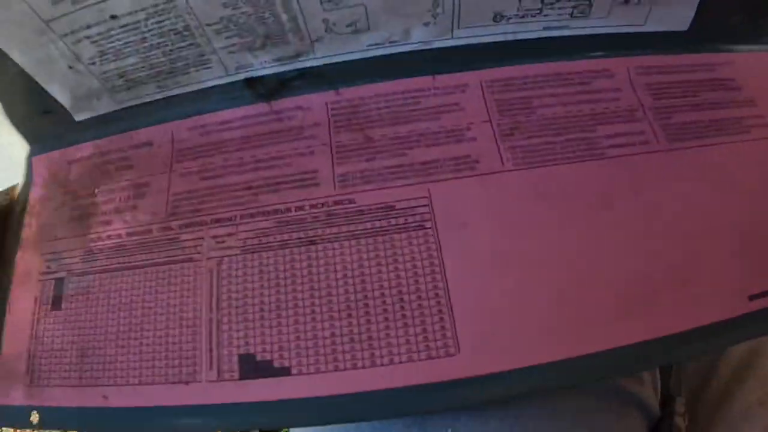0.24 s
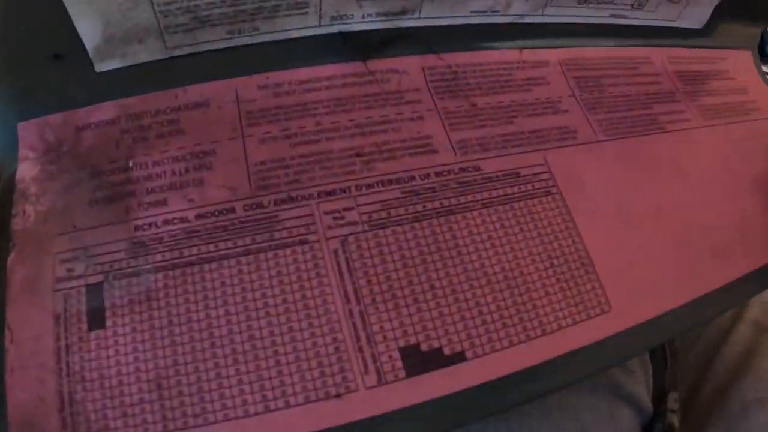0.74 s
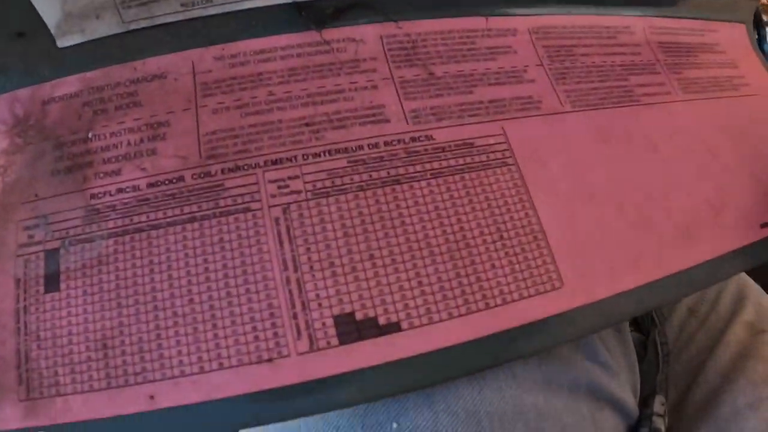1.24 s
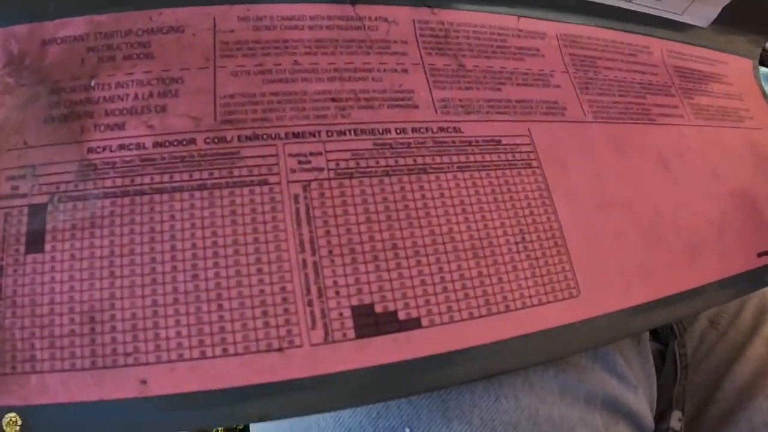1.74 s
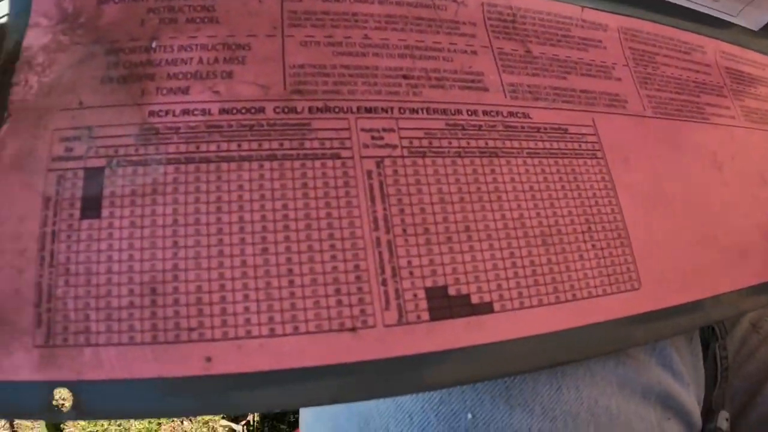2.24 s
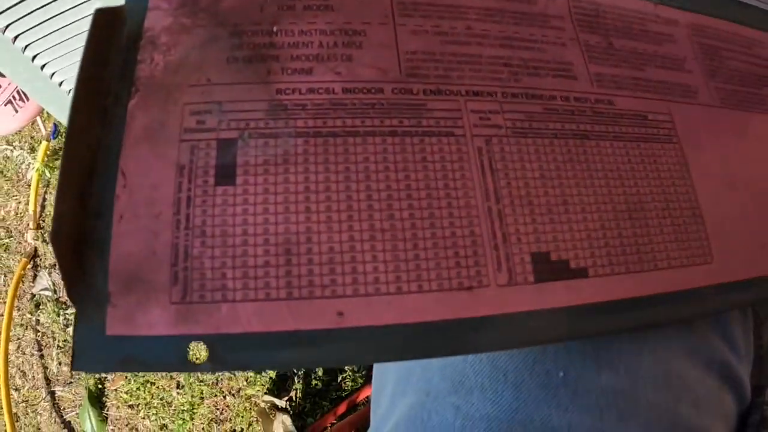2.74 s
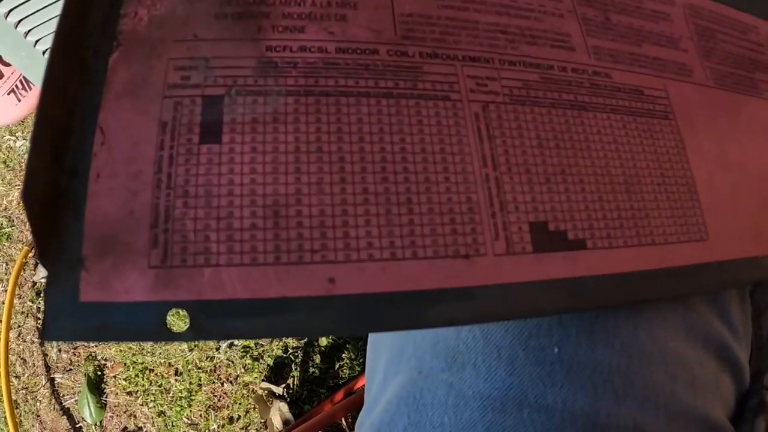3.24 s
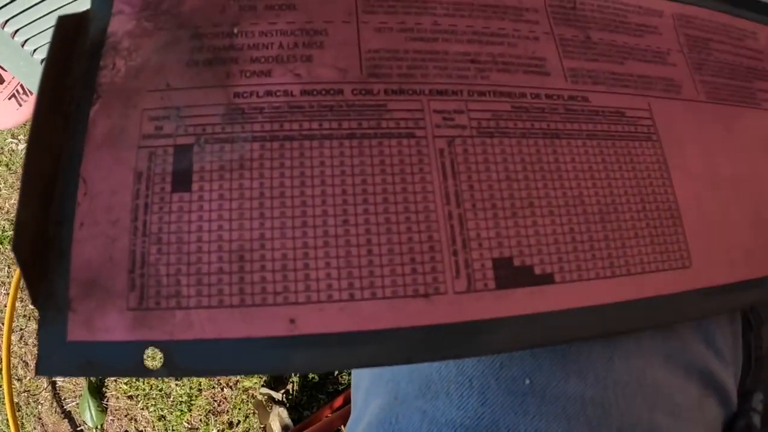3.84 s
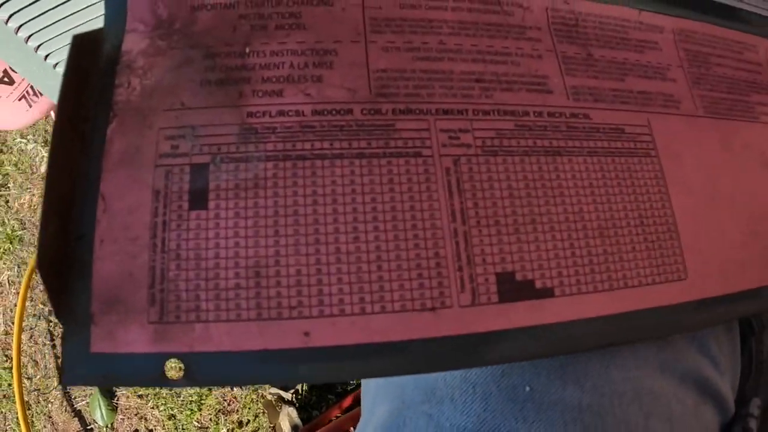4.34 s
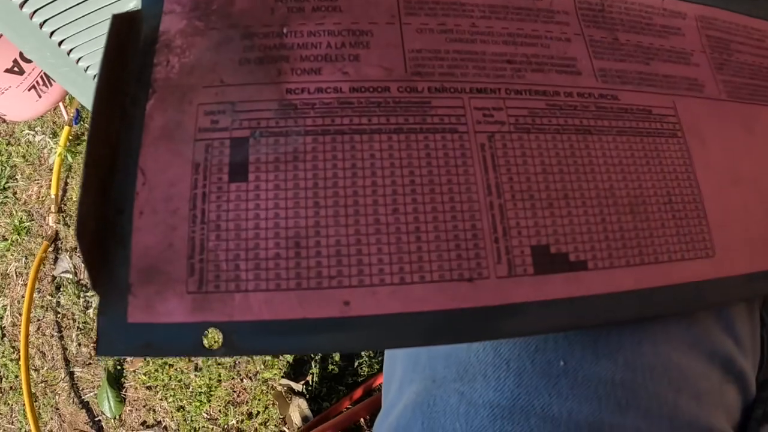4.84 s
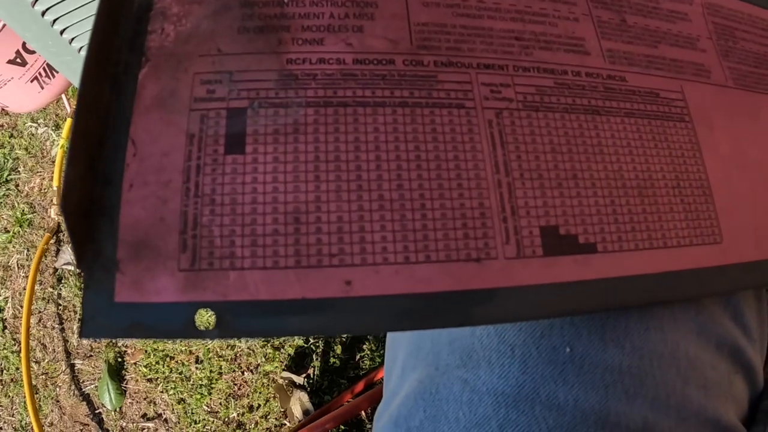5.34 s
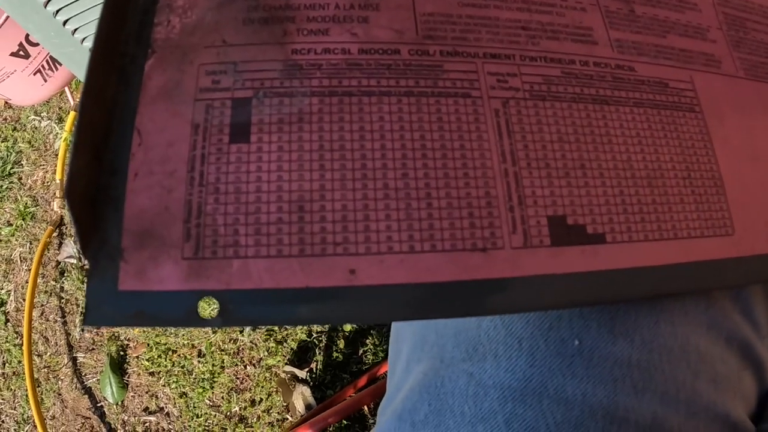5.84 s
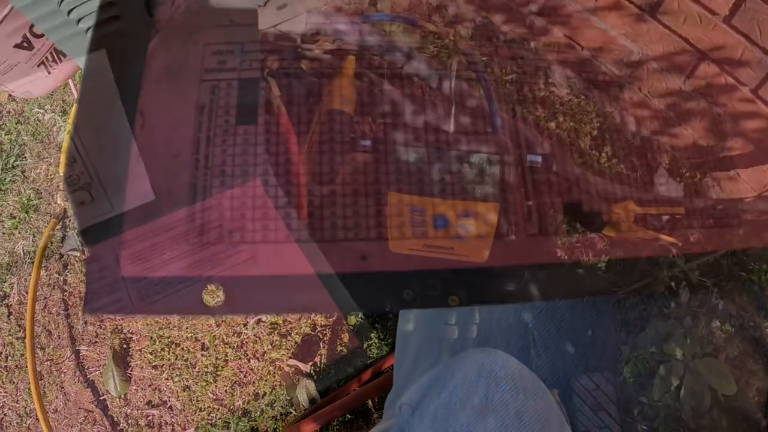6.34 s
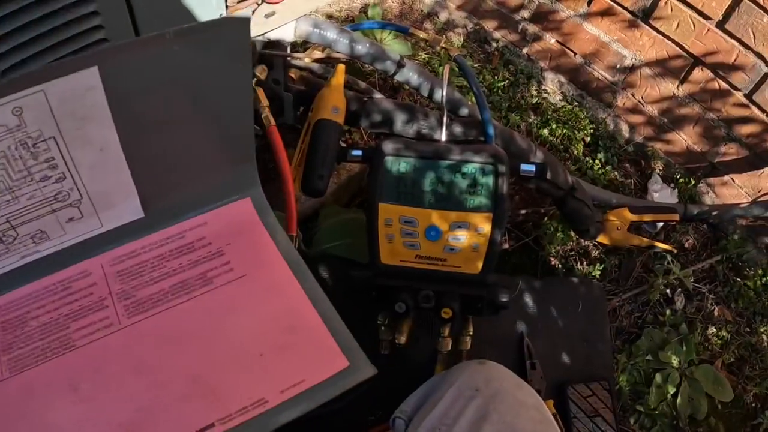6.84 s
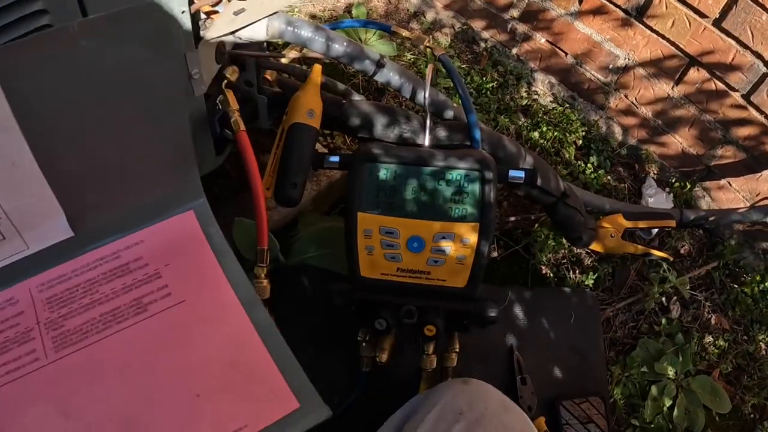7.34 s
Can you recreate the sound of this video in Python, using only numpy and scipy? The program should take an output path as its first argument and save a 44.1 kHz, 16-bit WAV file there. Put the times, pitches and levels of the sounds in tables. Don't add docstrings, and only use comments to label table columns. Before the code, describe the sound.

Close outdoor cooling unit running continuously: deep fluttering fan thump, breathy rush and faint compressor hum, broken briefly by a sharp sheet-metal tick.

```python
import sys
import numpy as np
from scipy import signal
from scipy.fft import rfft, irfft, next_fast_len
from scipy.io import wavfile
from scipy.ndimage import uniform_filter1d, map_coordinates

SR = 44100
rng = np.random.default_rng(int(sys.argv[2]) if len(sys.argv) > 2 else 0)


def rack_gain(trim_db):
    fader = np.asarray(trim_db, float)
    return 10 ** (fader / 20)


def output_pcm(signal):
    pcm = np.clip(np.atleast_2d(signal).T, -1, 1) * 32767
    wavfile.write(sys.argv[1], SR, np.round(pcm).astype(np.int16))


N = 334719
T = np.arange(N) / SR
PAD = next_fast_len(N + 8192)
HZ = np.fft.rfftfreq(PAD, 1 / SR)

# start in seconds, end in seconds.
DISSOLVE_S = (6.19, 6.674)
MIC_TURN_S = (2.2, 2.5)

BLADE_HZ, SHAFT_HZ, MAINS_HZ = 28.3, 59.36, 120
# multiple of the blade rate, peak level in dB at the first place, at the second.
THUMP = [(1, -13, -14.5), (2, -30.3, -26.5), (3, -41, -35.5), (4, -43, -42), (5, -48, -54), (6, -46, -52),
         (8, -43.5, -42), (10, -47, -46), (11, -45, -55), (12, -52, -52)]
BLADE_ANGLE = (-1.38, -4.1)
SKEW_RAD = 1.5
# band centre in Hz, depth in dB, lag in radians.
CHOP = [(90, 2, -3), (184, 2.5, 2.5), (308, 3, 1), (550, 3.5, -0.24), (945, 2.3, 0.7), (2200, 2.5, 0.6),
        (4500, 1.3, 1.3), (9000, 1.5, 2.3)]
SECOND_CHOP = .45
# frequency in Hz, density in dB per Hz.
RUSH = [
    [(39, -29), (66, 1.5), (86, -5), (113, -2), (141, -3), (192, -4), (222, 2), (257, -6.5), (298, -0.5),
     (359, -3.5), (550, -7), (878, -18.5), (951, -15.5), (1230, -15.5), (1600, -21.5), (2080, -78),
     (3520, -120)],
    [(39, -34), (66, -13), (124, -4), (172, -13), (225, -2), (260, -8.5), (302, -5), (410, -10.5),
     (560, -13.5), (850, -18.5), (960, -15.5), (1130, -18), (1400, -20), (1600, -27), (2080, -58),
     (3500, -120)],
]
# frequency in Hz, density in dB per Hz.
HISS = [
    [(940, -9), (1600, -6.5), (1700, 1), (2190, 2), (2390, -4), (2680, -3.5), (3400, -6.5), (4270, -9),
     (5090, -6), (6060, -14), (6920, -12.5), (8610, -22.5), (10200, -25), (13000, -28.5)],
    [(940, -18), (1600, 2), (1890, -1), (2060, 1), (2230, -3.5), (2760, -2.5), (3430, -3), (3980, -6.5),
     (5000, -6), (7550, -13), (9570, -23.5), (12200, -25), (13000, -23), (14300, -34)],
]
RUSH_DB = (-30, -30)
HISS_DB = (-46, -43)
# frequency in Hz, density in dB per Hz.
RUMBLE = [(4, -30), (9, 20), (30, 9), (60, 14.5), (75, -24), (120, -120)]
# frequency in Hz, gain in dB.
AIR_TOP = [(13000, 5.5), (13500, -9), (14000, -13), (15500, -20)]
# time in seconds, level in dB about the mean.
FLOW = [(0, 0.7), (.7, 0.9), (1.5, -0.3), (2.8, 0.5), (4, 0.2), (5.5, -0.08), (6.7, -0.5), (7.59, -1.5)]

# frequency in Hz, left-right likeness from 0 to 1.
ALIKE = [(60, 0.99), (300, 1), (610, 0.9), (1310, 0.93), (2000, 0.66), (2830, 0.59), (4200, 0.81),
         (6120, 0.64), (8000, 0.38), (10000, 0.78), (11500, 0.27), (13200, 0.17)]
# frequency in Hz, left over right in dB.
LEAN = [
    [(60, 0.0), (110, 0.0), (200, 0.0), (360, 1.0), (660, 1.5), (1200, 3.5), (2190, 2.5), (3990, 1.0),
     (7260, 2.5), (13200, 4.5)],
    [(60, 0.0), (110, 0.0), (200, 0.5), (360, 2.0), (660, 2.0), (1200, 4.5), (2190, 4.0), (3990, 3.5),
     (7260, 3.0), (13200, 5.5)],
]
# frequency in Hz, lead of the left in radians.
LEAD = [(100, -0.045), (600, 0.055), (1120, -1.25), (1460, 0.84), (2580, -0.43), (3620, 0.023), (9000, 0)]

# start in seconds, peak level in dB, pitch in Hz.
CHUFFS = [(0.0017, -25.7, 590), (0.0328, -23.8, 515), (0.0709, -24.4, 575), (0.1391, -24.2, 410),
          (0.3214, -24.7, 485), (0.3883, -24.9, 500), (0.5712, -24.7, 440), (0.6393, -22.0, 425),
          (0.7505, -24.7, 515), (0.7781, -23.2, 620), (0.8868, -23.1, 455), (1.0625, -23.7, 425),
          (1.0985, -24.0, 590), (1.2395, -22.4, 410), (1.311, -23.4, 470), (1.4849, -23.4, 575),
          (1.698, -23.4, 485), (1.7737, -23.7, 575), (1.8012, -24.2, 455), (1.8411, -25.9, 605),
          (1.91, -24.9, 665), (2.0174, -25.3, 560), (2.0495, -22.7, 425), (2.1555, -24.4, 485),
          (2.196, -25.8, 605), (2.4737, -25.1, 530), (2.5851, -24.2, 530), (2.7251, -25.1, 530),
          (2.9324, -24.5, 590), (3.2188, -24.8, 590), (3.3985, -24.7, 530), (3.5673, -25.8, 590),
          (3.7167, -24.4, 590), (3.7476, -25.2, 695), (3.926, -23.2, 410), (4.0321, -24.3, 500),
          (4.0648, -25.7, 560), (4.1055, -23.0, 545), (4.1381, -25.6, 590), (4.2744, -26.3, 680),
          (4.3109, -24.6, 440), (4.4224, -22.3, 425), (4.4863, -24.0, 680), (4.5645, -24.9, 530),
          (4.6299, -25.4, 665), (5.0204, -24.5, 635), (5.1239, -23.2, 515), (5.1961, -23.1, 575),
          (5.3399, -23.0, 590), (5.3747, -23.5, 560), (5.4146, -20.6, 425), (5.5177, -24.7, 500),
          (5.5505, -23.8, 530), (5.7586, -26.3, 650), (5.9367, -23.6, 455), (6.1202, -23.0, 515),
          (6.1468, -23.8, 515), (6.1873, -21.0, 410), (7.1119, -24.6, 440), (7.2201, -24.4, 470)]
# start in seconds, peak level in dB, pitch in Hz.
FLICKS = [(1.413, -26, 430), (3.255, -26, 498), (4.843, -27, 538), (4.948, -26, 611), (5.83, -27, 560),
          (6.809, -28, 484), (7.049, -27, 420)]
# start in seconds, peak level in dB, pitch in Hz.
ROLLS = [(0.001, -24.2, 221), (0.1486, -26.1, 325), (0.1834, -25.9, 309), (0.2178, -25.2, 293),
         (0.3141, -25.7, 309), (0.4122, -25.4, 349), (0.4537, -26.3, 333), (0.496, -22.7, 277),
         (0.5312, -23.4, 325), (0.575, -25.2, 237), (0.6153, -24.5, 309), (0.6449, -19.7, 301),
         (0.6862, -23.2, 269), (0.7409, -22.1, 253), (0.8147, -23.5, 237), (0.8563, -24.8, 245),
         (0.8897, -23.9, 221), (1.0909, -26.7, 357), (1.2407, -23.3, 309), (1.3145, -26.0, 317),
         (1.3453, -25.6, 317), (1.5209, -24.5, 309), (1.5705, -22.5, 237), (1.8026, -25.9, 309),
         (1.8879, -26.3, 349), (2.0563, -24.8, 309), (2.0904, -24.3, 237), (2.1943, -25.6, 309),
         (2.3121, -23.1, 237), (2.3695, -25.9, 341), (2.4134, -24.8, 317), (2.445, -23.9, 245),
         (2.4792, -22.5, 237), (2.6501, -22.8, 333), (2.8241, -25.0, 301), (3.0757, -24.4, 237),
         (3.2201, -23.3, 325), (3.2555, -26.0, 325), (3.5018, -24.4, 317), (3.6069, -24.9, 237),
         (3.6779, -25.1, 293), (3.7109, -21.8, 309), (3.7515, -24.2, 237), (3.7884, -24.8, 317),
         (3.86, -25.1, 309), (3.8915, -25.6, 309), (4.0002, -25.2, 229), (4.2454, -24.9, 309),
         (4.4229, -24.7, 221), (4.5032, -24.2, 229), (4.5352, -23.4, 237), (4.7994, -25.6, 317),
         (4.9191, -24.6, 237), (5.1263, -25.1, 245), (5.7319, -25.6, 325), (6.0724, -24.9, 317),
         (6.1758, -26.3, 365), (6.214, -26.5, 349), (6.7683, -24.3, 333), (7.1517, -24.9, 229)]
# start in seconds, peak level in dB, pitch in Hz.
SNAPS = [(0.111, -31, 751), (0.178, -31, 1200), (0.392, -28, 1200), (0.71, -30, 1200), (0.926, -30, 939),
         (1.038, -30, 1060), (1.172, -31, 794), (1.755, -29, 1250), (2.02, -31, 754), (2.384, -30, 1190),
         (2.558, -30, 1270), (2.694, -30, 818), (2.767, -30, 1180), (2.822, -29, 1260), (2.873, -30, 826),
         (2.933, -29, 770), (3.075, -28, 1190), (3.323, -29, 1250), (3.434, -29, 1360), (3.542, -30, 810),
         (3.72, -31, 1310), (3.798, -30, 937), (4.066, -30, 915), (4.111, -27, 1240), (4.493, -30, 1000),
         (4.64, -28, 1030), (4.843, -29, 1180), (4.925, -31, 1040), (5.069, -32, 950), (5.802, -30, 937),
         (5.913, -27, 953), (6.087, -31, 1050), (6.155, -31, 1250), (6.262, -30, 1230), (6.482, -32, 1240),
         (6.585, -30, 926), (6.659, -27, 1130), (6.727, -28, 1140), (6.763, -29, 1100), (7.032, -28, 1110),
         (7.222, -29, 1130), (7.283, -31, 1130), (7.4, -28, 926), (7.443, -31, 907), (7.511, -27, 904)]
# peak level in dB, pitch in Hz, decay in seconds.
FIRST_BURST = (-14.5, 400, .0016)
VORTEX_RISE_S, ROLL_RISE_S, SNAP_RISE_S = 0.0024, .007, 0.0015
ROLL_TRIM_DB, SNAP_TRIM_DB = -1.1, -3
SAG = .04
CALM_DB = 9

# multiple of the shaft rate, peak level in dB early, in dB after the microphones
# turn, in dB at the second place, left over right in dB.
ORDERS = [(1, -47, -52, -45, 0), (2, -48, -51, -49, 0), (5, -44, -49, -43, 0), (11, -49, -48, -55, 1),
          (15, -61, -57, -55, 7), (16, -54, -48.5, -54, 7), (17, -62, -61, -54, 4), (18, -65, -63, -54, 4),
          (19, -53, -52, -46, 6), (20, -47.5, -48, -56, 2), (21, -61, -57, -56, 1), (34, -67, -70, -68, 2),
          (70, -74, -66, -65, 2), (84, -74, -73, -76, 2)]

# start in seconds, peak level in dB, ring T60 in seconds, bite from 0 to 1, ring pitch in Hz.
SLIPS = [(3.2435, -47, .12, .05, 7350), (3.2505, -40, .05, .3, 7200), (3.2538, -37, .04, .35, 8300),
         (3.2562, -23.5, .012, .2, 7400), (3.2632, -33, .06, .15, 7400), (3.2652, -37, .04, .6, 8300),
         (3.269, -33, .016, 1, 7300), (3.2712, -30, .022, .25, 7450), (3.2735, -31, .015, .3, 7600),
         (3.2752, -38, .02, .5, 10200), (3.279, -45, .04, .75, 8300)]
# frequency in Hz, level in dB, left over right in dB.
EDGE_MODES = [(3600, -12, 0), (4550, -1, -5), (5450, -1, 6), (6500, -6, 2), (7000, -4, -3), (8400, -3, -3),
              (9400, -9, 0), (10200, -5, 0), (11200, -11, 6), (12000, -5, 10), (12900, -9, 10),
              (14200, -14, 8)]
# frequency in Hz, gain in dB.
EDGE_TOP = [(13100, 0), (13500, -13), (16000, -16)]
LIGHT_DB, BITE_DB = -17, 17
GRIT = .5
# centre in seconds, level in dB, half length in seconds, pitch in Hz.
SCRAPES = [(.008, -54, .006, 4000), (.048, -64, .004, 10000), (.07, -64, 0.0054, 10500),
           (.062, -57, .022, 7960), (.125, -62, .02, 7500), (.32, -55.5, 0.49, 4500),
           (.538, -61, 0.008, 8500), (.515, -66, .006, 9000), (.548, -51, 0.015, 4900),
           (1.02, -65, 0.018, 10000), (2.83, -61, .006, 6500), (6.692, -57, .006, 7000)]
# centre in seconds, level in dB, half length in seconds, pitch in Hz.
FLEXES = [(.45, -61, .04, 7100), (0.1, -59, .03, 5050), (3.8, -55, .008, 5400), (0.59, -55, .025, 5180),
          (.69, -61, .025, 5050), (0.54, -27.5, 0.04, 166.4), (0.52, -61, 0.092, 4960),
          (0.82, -29.5, 0.025, 109), (.76, -66, .06, 5100)]
SCRAPE_OCTAVES, FLEX_OCTAVES = 0.56, 0.063
SHARPENING = .35

# centre in seconds, peak level in dB, left over right in dB.
GUSTS = [
    (7.529, -17, -9),
    (7.563, -19, -6.5),
]
GUST_HALF_S, BUFFET_DB = 0.0029, -53


def fan(place):
    blade = 2 * np.pi * BLADE_HZ * T + BLADE_ANGLE[place] + 0.046 * wobble(2.52)
    thump = np.zeros(N)
    for k, *db in THUMP:
        level = rack_gain(db[place] + 0.12 * np.sqrt(k) * wobble(5.2))
        thump += level * np.cos(k * blade + SKEW_RAD * max(k - 2, 0))
    flow_db = np.interp(T, *np.transpose(FLOW))
    rush = chopped(pair(RUSH[place], LEAN[place]), blade, eddy_db=.6, place=place)
    hiss = chopped(pair(HISS[place], LEAN[place]), blade, eddy_db=0.82, place=place)
    rumble = rack_gain(-40) * unit(from_spectrum(pair(RUMBLE, LEAN[place])))
    air = rack_gain(RUSH_DB[place] + flow_db) * rush + rack_gain(HISS_DB[place] + flow_db) * hiss
    return thump + air + rumble + shedding(place)


def chopped(spectra, blade, eddy_db, place):
    centres = [hz for hz, _, _ in CHOP]
    out, shared = np.zeros((2, N)), wobble(BLADE_HZ)
    root, tip = calm(ROLLS, ROLL_RISE_S), calm(CHUFFS + FLICKS, VORTEX_RISE_S)
    snap = calm(SNAPS, SNAP_RISE_S)
    thinned = {1: root / 2, 2: np.minimum(root, tip / 2), 3: tip, 4: np.minimum(tip / 4, snap / 2)}
    for k, (hz, depth_db, lag) in enumerate(CHOP):
        share = along([(c, float(j == k)) for j, c in enumerate(centres)])
        cycle = np.cos(blade - lag + 0.83 * np.cos(blade - lag))
        heard = SECOND_CHOP if place and hz > 700 else 1
        swell_db = depth_db * heard * cycle + eddy_db * (.5 * shared + .7 * wobble(14))
        band = from_spectrum(spectra * share * rack_gain(along(AIR_TOP)))
        out += rack_gain(swell_db + thinned.get(k, 0)) * band
    return out / np.sqrt(np.mean(out.mean(0) ** 2))


def calm(rows, rise):
    crests = [round((s + 1.5 * rise) * SR) for s, _, _ in rows]
    pulses = np.bincount(crests, minlength=N)[:N]
    dips = signal.fftconvolve(pulses, np.hanning(round(8 * rise * SR)), "same")
    return -CALM_DB * np.minimum(dips, 1)


def shedding(place):
    out, t = np.zeros(N + SR), np.arange(SR // 20) / SR
    passes = (np.arange(1, N / SR * BLADE_HZ) - BLADE_ANGLE[place] / (2 * np.pi) - 1.2) / BLADE_HZ
    for s, (late, size, pitch) in zip(passes, rng.standard_normal((len(passes), 3))):
        free = min(abs(s - row[0]) for row in CHUFFS + FLICKS) > .5 / BLADE_HZ
        level = free * rack_gain(-32 + 2.0 * size) * np.sign(late)
        start = max(round((s + .002 * late) * SR), 0)
        out[start:][:len(t)] += level * vortex(440 * np.exp(.2 * pitch), t, 1.48 * VORTEX_RISE_S, SAG)
    return out[:N] * rack_gain([[.7], [-.7]])


def chuffs():
    out, t = np.zeros(N + SR), np.arange(SR // 14) / SR
    kinds = [(CHUFFS + FLICKS, VORTEX_RISE_S, 0), (ROLLS, ROLL_RISE_S, ROLL_TRIM_DB),
             (SNAPS, SNAP_RISE_S, SNAP_TRIM_DB)]
    for rows, rise, trim_db in kinds:
        sag = SAG * VORTEX_RISE_S / rise / 2
        for s, db, hz in rows:
            out[round(s * SR):][:len(t)] += rack_gain(db + trim_db) * vortex(hz, t, rise, sag)
    db, hz, decay = FIRST_BURST
    out[:len(t)] += rack_gain(db) * np.exp(-t / decay) * np.cos(2 * np.pi * hz * t)
    return out[:N] * rack_gain([[.7], [-.7]])


def vortex(hz, t, rise, sag):
    u = t / rise
    return u * np.exp(1 - u) * np.sin(2 * np.pi * hz * t * (1 + sag * (2 - np.minimum(u, 9))))


def compressor(place):
    shaft = 2 * np.pi * SHAFT_HZ * T + 0.029 * wobble(2.056)
    orders = np.zeros((2, N))
    for k, early_db, turned_db, second_db, lean_db in ORDERS:
        db = second_db if place else np.interp(T, MIC_TURN_S, [early_db, turned_db])
        tone = rack_gain(db - 1.5 + 0.73 * wobble(4.6)) * np.sin(k * shaft + rng.uniform(0, 2 * np.pi))
        orders += tone * rack_gain([[lean_db / 2], [-lean_db / 2]])
    hiss = unit(from_spectrum(pair(HISS[place], LEAN[place]) * rack_gain(along(AIR_TOP))))
    valve = rack_gain(-50.5) * hiss * np.cos(shaft / 2) ** 4
    hum_db = [(1, -43), (3, -47.5), (6, -59.5), (8, -55)]
    hum = sum(rack_gain(db) * np.sin(2 * np.pi * k * MAINS_HZ * T + k) for k, db in hum_db)
    return orders + hum + valve


def slips():
    out, t = np.zeros((2, N)), np.arange(SR // 10) / SR
    for s, db, t60, bite, ring_hz in SLIPS:
        sound = rack_gain(-2 - 10 * bite ** 2) * np.sin(2 * np.pi * ring_hz * t)
        for hz, level, lean_db in EDGE_MODES:
            reach_db = LIGHT_DB + BITE_DB * (bite ** 2 if hz < 6800 else bite)
            rough = 1 + GRIT * 5 * uniform_filter1d(rng.standard_normal((2, len(t))), 25, axis=1)
            pitch = hz * (1 + .015 * rng.standard_normal())
            mode = np.sin(2 * np.pi * pitch * t + rng.uniform(0, 2 * np.pi))
            sound = sound + rack_gain(level + reach_db + lean_db * np.array([[.5], [-.5]])) * rough * mode
        envelope = rack_gain(db - 60 * t / t60) * (1 - np.exp(-t / .0004))
        out[:, round(s * SR):][:, :len(t)] += envelope * sound
    return from_spectrum(rfft(out, PAD) * rack_gain(along(EDGE_TOP))) * rack_gain([[1.5], [-1.5]])


def hand():
    white = rfft(rng.standard_normal((2, PAD)) + 2.0 * rng.standard_normal(PAD))
    out = np.zeros((2, N))
    for rows, width, sharpening in [(SCRAPES, SCRAPE_OCTAVES, 0), (FLEXES, FLEX_OCTAVES, SHARPENING)]:
        for s, db, half, hz in rows:
            octaves = width * (300 / hz) ** sharpening
            band = np.exp(-.5 * (np.log2((HZ + 1) / hz) / octaves) ** 2)
            puff = unit(from_spectrum(white * rack_gain(along(AIR_TOP)) * band))
            grit_db = 2.3 * (octaves > .2) * wobble(hz / 20)
            out += rack_gain(db + grit_db) * np.exp(-.5 * ((T - s) / half) ** 2) * puff
    return out * rack_gain([[2.2], [-2.2]])


def wind():
    out = rack_gain(BUFFET_DB) * unit(from_spectrum(rfft(rng.standard_normal((2, PAD))) * rack_gain(along(RUMBLE))))
    for s, db, lean in GUSTS:
        out += rack_gain([[db + lean / 2], [db - lean / 2]]) * np.exp(-.5 * ((T - s) / GUST_HALF_S) ** 2)
    return out


def pair(spectrum, lean):
    a, b = rfft(rng.standard_normal((2, PAD))) * rack_gain(along(spectrum))
    spread = np.arccos(np.clip(along(ALIKE), -1, 1)) / 2
    tilt = rack_gain(along(lean) / 2) * np.exp(.5j * along(LEAD))
    left, right = np.cos(spread) * a + np.sin(spread) * b, np.cos(spread) * a - np.sin(spread) * b
    return np.array([left * tilt, right / tilt])


def from_spectrum(spectrum):
    return irfft(spectrum, PAD)[..., :N]


def along(points):
    f, v = np.transpose(points)
    return np.interp(np.log(HZ + 1), np.log(f + 1), v)


def wobble(rate):
    return map_coordinates(rng.standard_normal(int(N * rate / SR) + 4), [T * rate])


def unit(x):
    return x / np.sqrt(np.mean(x ** 2) + 1e-20)


def scene():
    fade = np.clip((T - DISSOLVE_S[0]) / (DISSOLVE_S[1] - DISSOLVE_S[0]), 0, 1)
    first, second = (fan(place) + compressor(place) for place in range(2))
    return (1 - fade) * first + fade * second + chuffs() + hand() + slips()


def band_limit(x):
    return signal.sosfilt(signal.butter(12, 15100, fs=SR, output="sos"), x)


def record(dry):
    mid = dry.mean(0)
    side_db = [(30, -13), (90, -18), (160, -18), (260, -6.5), (420, 0.5)]  # Hz, dB
    side = from_spectrum(rfft(dry[0] - mid, PAD) * rack_gain(along(side_db)))
    mix = np.array([mid + side, mid - side]) + wind() - .0033
    return band_limit(mix)


dry = scene()
out = record(dry)
output_pcm(out)
```